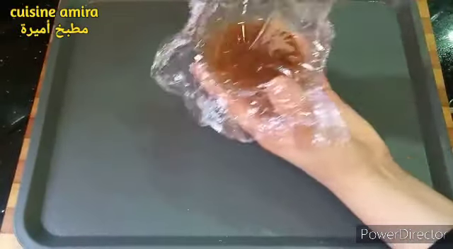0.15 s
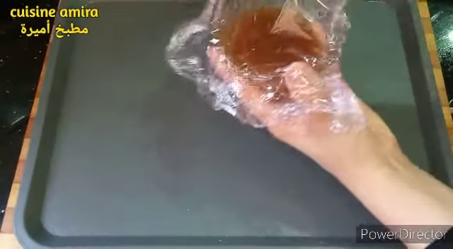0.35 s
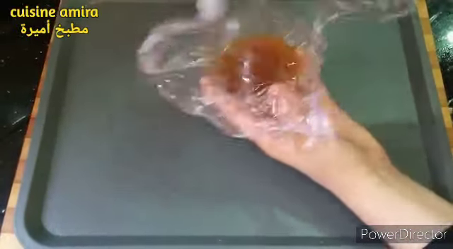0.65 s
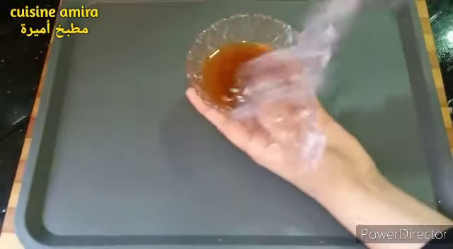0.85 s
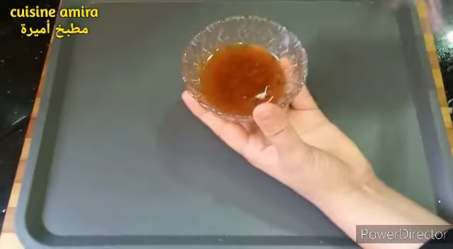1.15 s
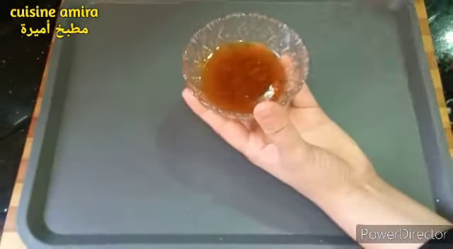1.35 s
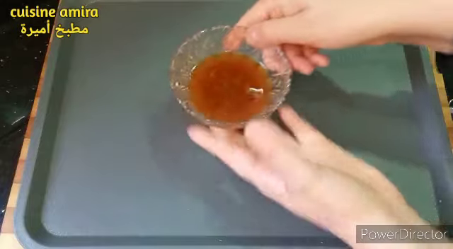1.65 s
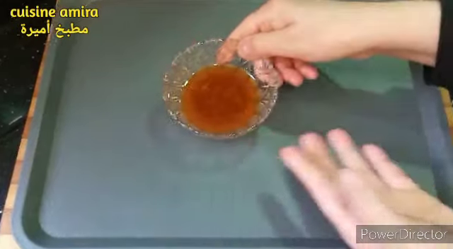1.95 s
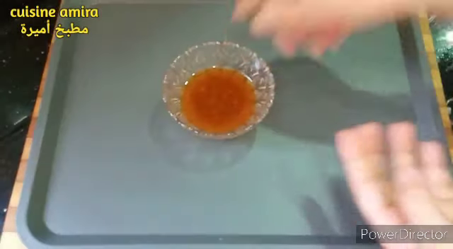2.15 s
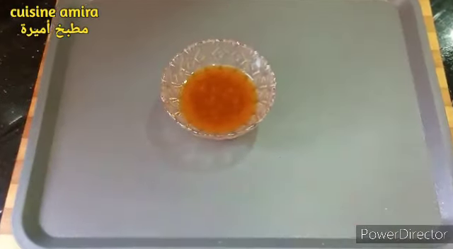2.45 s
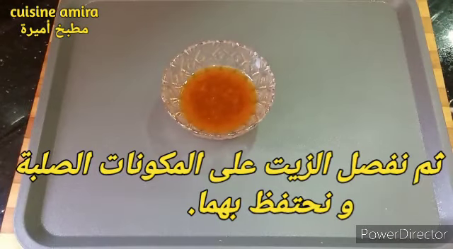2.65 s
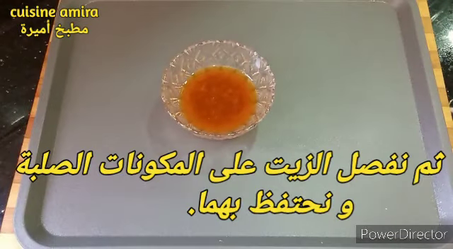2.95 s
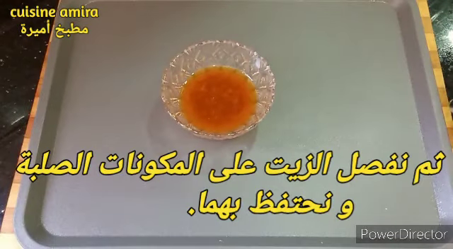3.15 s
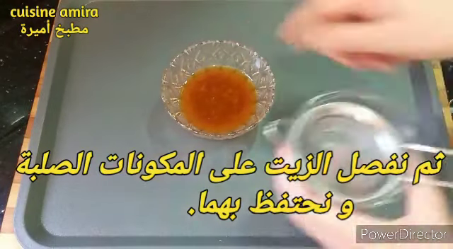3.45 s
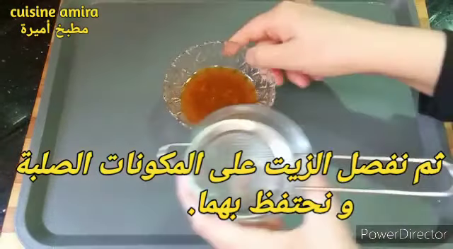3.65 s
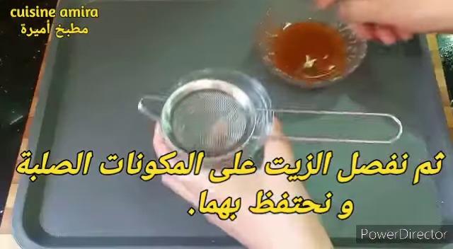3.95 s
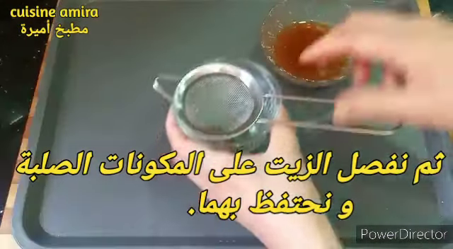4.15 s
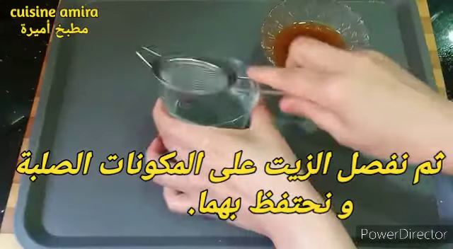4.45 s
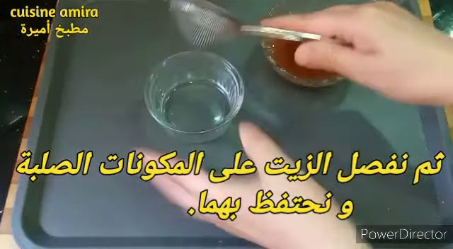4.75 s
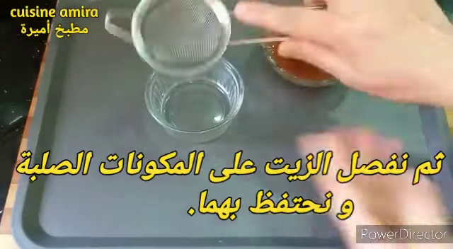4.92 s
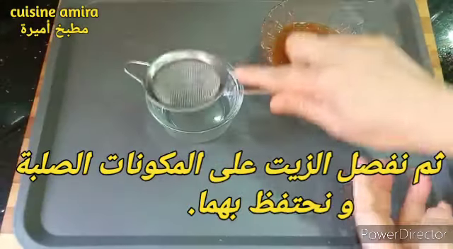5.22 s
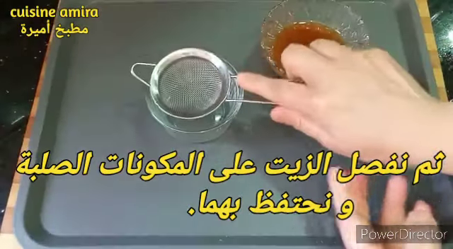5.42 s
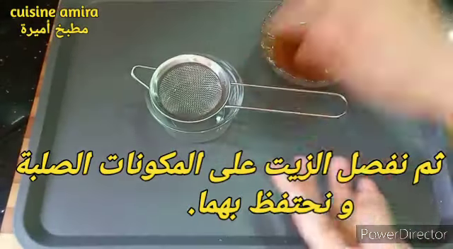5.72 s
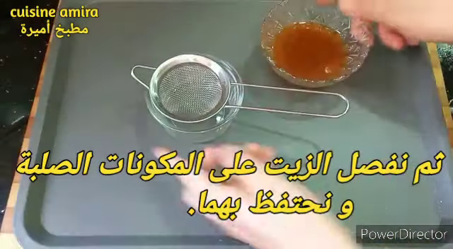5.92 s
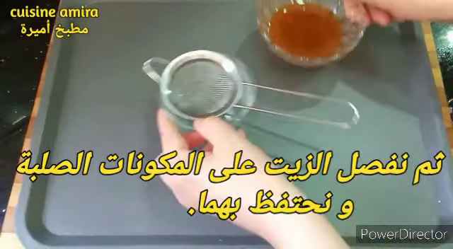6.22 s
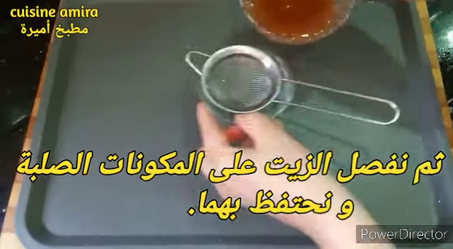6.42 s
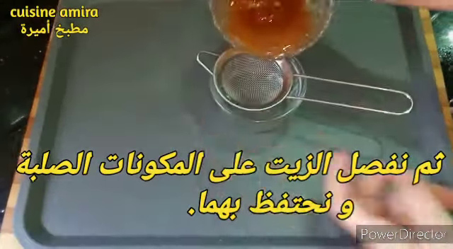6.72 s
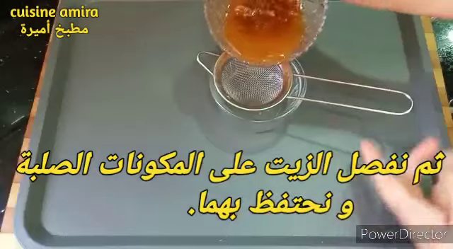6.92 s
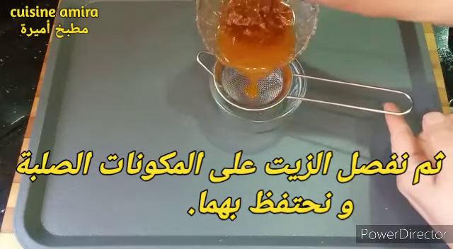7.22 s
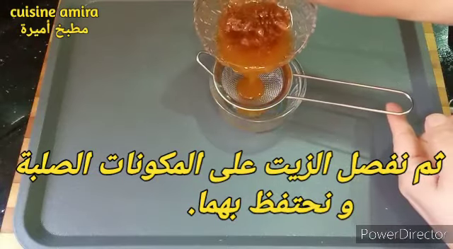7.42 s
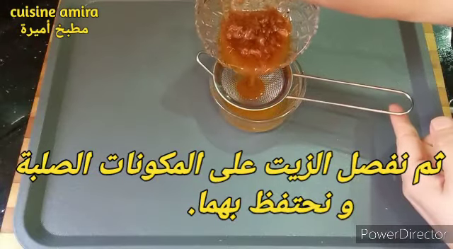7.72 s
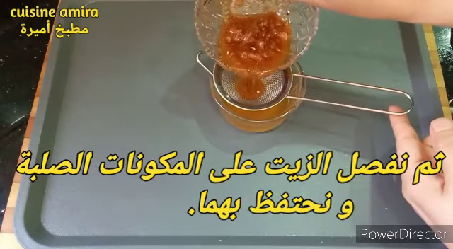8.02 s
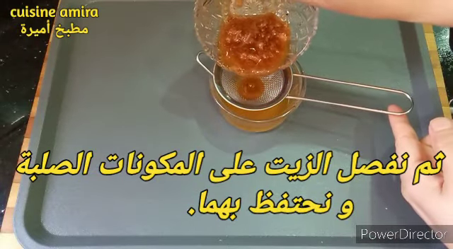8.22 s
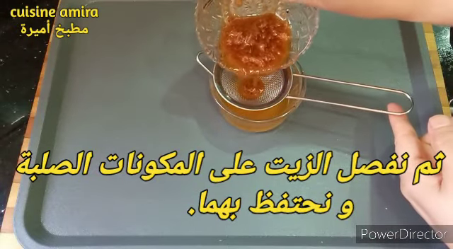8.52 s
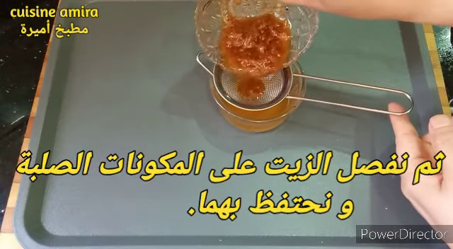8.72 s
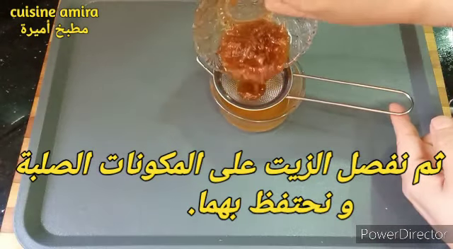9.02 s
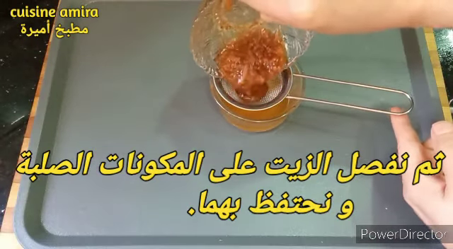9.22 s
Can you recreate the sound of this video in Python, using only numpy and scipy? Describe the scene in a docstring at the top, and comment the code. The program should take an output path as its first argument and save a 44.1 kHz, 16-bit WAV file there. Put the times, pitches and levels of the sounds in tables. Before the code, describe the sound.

A brief close kitchen moment opens: plastic wrap crinkling and snapping, soft clinks from a glass bowl, a fridge humming. It stops dead and woodland birdsong follows. One songbird near the microphone delivers a rapid trilled phrase with downward sweeps, pauses while distant birds chirp and give rising whistles, then sings again. The notes trail off among the trees above a soft, steady hush of air.

```python
"""Cling film crackles off a ringing glass bowl over a fridge hum; the kitchen stops dead at 1.5 s.
Then a wood: a near songbird sings two phrases (buzz, trill, falling sweeps, flourish) and farther
birds whistle around them over a soft hush. The film is dense clicks through resonances, the bowl
decaying sines, the hum narrow noise bands. Each bird note is a gliding, often warbling sine;
trunks and leaves scatter it into a long tail."""
import sys
import numpy as np
from scipy import signal
from scipy.fft import rfft, irfft
from scipy.io import wavfile
from scipy.ndimage import uniform_filter1d

SR = 44100
rng = np.random.default_rng(int(sys.argv[2]) if len(sys.argv) > 2 else 0)


def file_out(sig):
    """Save sig as 16-bit WAV at sys.argv[1]."""
    # one column per channel
    cols = np.atleast_2d(sig).T
    # limit, then scale
    lim = np.clip(cols, -1, 1)
    pcm = np.round(lim * 32767).astype(np.int16)
    wavfile.write(sys.argv[1], SR, pcm)


N = 413216

# hush of the wood: freq_hz, gain_db
HUSH_SPECTRUM = [(15, -48), (25, -17), (86, -8.5), (204, -7.5), (482, -8), (1110, -4), (1620, -7),
                 (3930, 2), (4380, -5), (5140, -6.5), (6050, -10.5), (14300, -14.5), (15500, -31)]
# distant rumble: time_s, level_db
RUMBLE_LEVELS = [(1.58, -73), (3.0, -74.5), (4.5, -77), (5.4, -75), (6.1, -78), (6.5, -72.5), (8.3, -78),
                 (9.37, -77.5)]

# fridge: centre_hz, width_hz, level_db
HUM_BANDS = [(45, 49, -69), (105, 18, -65), (140, 9.1, -56.5), (149.6, 36, -59.5), (225, 38, -68.5)]
# resonances of film, film treble, bowl and worktop: centre_hz, width_hz, gain_db
FILM_MODES = [(1382, 620, -4), (2350, 1750, -1), (3510, 1200, 0.8)]
SHEEN_MODES = [(6820, 1250, 0), (13400, 3900, -14.5)]
BOWL_MODES = [(252, 310, -1.5), (422, 105, -1.5), (589, 103, 3.5), (893, 215, -0.5), (1058, 320, 0)]
# hands on the bowl: time_s, level_db
HAND_LEVELS = [(0, -43), (.012, -44), (.032, -43), (.12, -50), (.236, -47.5), (.35, -54), (.44, -51),
               (.85, -60.5), (.95, -51.5), (1.004, -56), (1.19, -71), (1.264, -56), (1.4, -70), (1.49, -55)]
# bowl rings: start_s, pitch_hz, level_db, t60_s
BOWL_RINGS = [(.005, 574, -63, 0.49), (.182, 1590, -36, 0.071), (.235, 1586, -36, 0.11),
              (.18, 592, -48, 0.21), (.44, 1583, -42, 0.33), (.44, 593, -43, 0.22), (1.235, 656, -48, 0.54)]
# tugs on the film: peak_s, level_db, rise_s, fall_s
FILM_TUGS = [(.015, -39, 0.045, 0.065), (0.037, -42, 0.0046, 0.08), (0.453, -44.5, 0.044, 0.57),
             (.688, -47, 0.014, 0.018), (.95, -47, 0.013, 0.038), (1.152, -55.5, 0.026, 0.043),
             (1.264, -80.5, 0.037, 0.046), (1.49, -52.5, 0.057, 0.054)]
# snapping creases: start_s, peak_db, centre_hz, t60_s
CREASE_SNAPS = [(0.033, -20, 2100, .015), (.062, -32, 1400, .015), (.452, -36, 1580, .02),
                (.48, -33, 1100, .02), (.505, -35, 1500, .02), (0.721, -37, 1660, .02),
                (0.829, -37, 1600, .025), (0.866, -42, 1500, .025), (.908, -47, 7000, .015),
                (0.932, -31, 2000, .02), (0.951, -30, 1550, .03), (1.1, -47, 1770, .02),
                (1.137, -49, 2650, .02)]

# warbled syllables: offset_s, pitch_hz, gain_db, depth_hz
BUZZ_CONTOUR = [(0, 5190, -20.5, 203), (.014, 5390, -14, 800), (.035, 5160, -7, 834), (.075, 5274, -6, 916),
                (.094, 4900, -7, 1000), (.102, 4460, -8.5, 610)]
SWEEP_CONTOUR = [(-.018, 5697, -45.5, 150), (-.006, 6000, -37, 220), (-.001, 5796, -22, 250),
                 (.003, 5386, -12, 650), (.013, 4400, -5.5, 510), (.032, 4150, -4.5, 490),
                 (.045, 3573, -4.5, 290), (.056, 3100, -5, 68), (.069, 2592, -5.5, 0.45),
                 (.079, 2040, -28, 3.4)]
# trill note, closing arch: offset_s, pitch_hz, gain_db
CHIP_CONTOUR = [(.0085, 3950, -19), (.0115, 5210, -14.5), (.014, 5054, -16.5), (.017, 4280, -12.5),
                (.021, 3800, -10), (.027, 3700, -12), (.032, 3600, -26)]
ARCH_CONTOUR = [(0, 2580, -10), (.006, 4110, -0.5), (.012, 5035, -5), (.018, 5010, -5), (.025, 3800, -3),
                (.031, 2580, -6)]
# glided syllables: offset_s, length_s, start_hz, peak_hz, end_hz, gain_db, peak_share, start_gain_db
TICK_GLIDES = [(0, .0062, 6300, 4700, 3500, -18, .55, -13)]
HOOK_GLIDES = [(.009, .009, 4570, 4980, 3250, -13, 0.24, -4),
               (.018, 0.016, 3330, 3830, 3730, -10.5, 0.35, -14)]
DROP_GLIDES = [(-.008, .005, 5860, 3940, 3530, -4, 0.35, -36),
               (-.001, .035, 3965, 3457, 1850, -1.5, 0.146, -5),
               (.043, .013, 1950, 2786, 3690, -8.5, .55, -19),
               (.056, 0.011, 3680, 2490, 2240, -12.5, 0.82, 0.5)]
GRACE_GLIDES = [(.08, .022, 2990, 2630, 1890, -8, 0.3085, -18.5),
                (.105, .016, 2494, 2185, 1886, -13.5, 0.37, -25.5)]

# syllables as sung: start_s, level_db, pitch_ratio, length_ratio, pan_db (left minus right), reach_ratio
BUZZES = [(1.39, -57, 1.015, 1.02, -2, 0.76), (1.627, -33, 0.97, 0.94, 3.5, 0.82),
          (6.577, -45.5, 1.06, 1.03, -6, 0.68)]
DROPS = [(2.184, -31, 1.017, .99, 1.6, 0.92), (7.222, -27.5, 1.03, 1.14, 3.9, 0.86)]
SWEEPS = [(2.3524, -29.5, 0.97, 1, 1.7, 0.97), (2.564, -28.5, 1.023, 0.96, 2.6, 1.013),
          (7.3916, -27, 1.037, 0.99, 1.2, 0.95), (7.608, -26.5, 1.072, 0.89, 1.6, 1.08)]
ARCHES = [(2.983, -39.5, 1.08, 1, 4.3, 0.91), (8.08, -42.5, 1, 1.01, 4.2, 0.95)]
FAR_BUZZES = [(3.67, -58, .74, 2.5, 3.1, 0.303), (5.847, -59.5, 0.896, 0.94, 5.6, .6)]
# trill notes as sung: start_s, level_db, pitch_ratio, reach_ratio
TRILL_CHIPS = [(1.775, -22, 1.04, 1), (1.8477, -26.5, 1.03, 1.07), (1.9792, -17.5, 0.98, 0.96),
               (2.0455, -19.5, 0.95, 0.64), (2.1074, -17.5, 0.95, 0.56), (6.782, -27.5, 0.98, 1.16),
               (6.846, -27.5, 1.066, 0.82), (6.9088, -21.5, 1.0, 1.1), (6.9727, -21, 0.98, 1.12),
               (7.0357, -21.5, 0.97, 1.005), (7.0934, -20, 0.97, 0.81)]
TRILL_HOOKS = [(1.9134, -19, 1.013, 0.75), (6.7172, -29.5, 0.97, 0.97), (7.1545, -17.5, .96, 0.97)]
# flourish lead-in: start_s, length_s, start_hz, peak_hz, end_hz, level_db, peak_share, start_gain_db
FLOURISH_LEADS = [(2.738, 0.0052, 6160, 4410, 3260, -38, 0.61, -14),
                  (2.751, 0.023, 2950, 2890, 2770, -38, 0.47, -15),
                  (2.767, 0.038, 2665, 3910, 3330, -29, 0.82, -28),
                  (7.809, 0.011, 2570, 3300, 2100, -42.5, 0.22, -8),
                  (7.818, 0.034, 2090, 3387, 3420, -33.5, 0.61, -26),
                  (7.845, 0.012, 3462, 4698, 2440, -34.5, 0.4, 3)]
# flourish warbles: the lead-in columns, then end_gain_db, depth_hz, rate_hz, crest_s, pan_db
FLOURISH_WARBLES = [(2.803, 0.047, 3150, 3050, 3000, -35.5, .55, -5, -2, 450, 62.1, 2.813, 1.5),
                    (2.848, .06, 2900, 2700, 1950, -42, .15, -3, -6, 330, 111, 2.853, 1.5),
                    (7.855, 0.056, 2850, 2900, 2650, -36, 0.5, -2, -2, 480, 51.9, 7.864, .6),
                    (7.91, .022, 2500, 2400, 2200, -40, .3, -3, -8, 350, 100, 7.916, .6),
                    (7.932, .078, 2150, 2120, 2050, -49, .5, -3, -3, 230, 102, 7.949, .6)]
# swell of each flourish warble: length_share, depth_share
WARBLE_SWELL = [(0, 0.34), (.3, 0.85), (.65, 1), (1, 0.33)]
# bill snapping shut: time_s, peak_db
BILL_SNAPS = [(1.778, -36), (1.794, -56), (7.282, -42)]

# far whistles: start_s, length_s, start_hz, peak_hz, end_hz, level_db, pan_db
FAR_WHISTLES = [(1.565, 0.039, 6440, 6100, 7450, -63.5, -3), (3.462, 0.051, 1880, 2180, 1850, -60.5, 12.5),
                (3.561, 0.1, 2045, 1990, 2320, -65, 16.5), (3.545, 0.14, 3760, 4084, 4085, -54, 0),
                (3.679, 0.15, 3730, 3796, 4060, -58.5, 4.5), (3.773, 0.13, 3620, 3720, 3840, -60, -2),
                (3.904, 0.054, 3600, 3710, 3580, -66, -6), (1.698, 0.26, 3220, 3100, 2764, -64, 1.5),
                (1.974, 0.073, 2266, 2236, 2110, -70, -7.5), (2.54, 0.11, 8200, 7880, 7780, -66.5, -1),
                (2.852, 0.099, 5100, 4880, 4880, -62, 3), (2.943, 0.065, 5420, 5350, 5270, -59.5, 3),
                (3.013, .07, 5400, 5320, 5250, -60.5, 3), (3.042, 0.09, 3304, 3354, 3490, -60, 14.5),
                (3.61, 0.061, 3570, 3190, 3970, -59.5, 1), (4.15, 0.049, 3680, 3550, 3400, -73, 13),
                (4.348, 0.064, 3450, 3390, 3350, -68, 8), (4.608, 0.12, 4230, 4130, 4360, -73, 1),
                (4.611, 0.34, 3410, 3350, 3430, -72.5, 5), (4.888, 0.18, 4270, 4210, 4210, -73.5, 6),
                (4.61, 0.19, 2060, 2197, 2404, -63.5, 8), (4.011, 0.025, 2190, 2100, 1860, -64, 13),
                (4.745, .025, 2620, 2255, 1960, -54, 8), (5.269, 0.074, 4040, 3965, 4020, -59.5, 6.5),
                (5.423, 0.031, 2030, 2625, 4080, -58, 12), (5.424, 0.049, 4290, 5460, 7800, -66.5, 16),
                (5.45, 0.053, 3650, 4394, 3920, -47.5, 1), (5.654, 0.084, 4000, 4034, 3905, -57, 3),
                (5.713, 0.23, 4006, 3916, 3814, -59, 5), (6.324, 0.017, 1870, 2000, 2320, -71.5, 16),
                (6.454, 0.41, 3200, 3090, 2815, -64, 2.5), (6.521, 0.039, 6250, 6220, 6400, -68, -6),
                (8.097, 0.014, 10300, 8100, 7540, -54.5, 13.5), (6.72, 0.17, 8150, 8070, 8300, -72, -3),
                (7.078, 0.021, 5680, 6070, 5930, -58, -14.5), (7.565, 0.039, 3770, 3320, 2880, -49, 8),
                (8.434, 0.15, 2990, 2977, 2992, -65.5, -1), (9.016, 0.071, 2870, 2970, 2860, -70.5, -6),
                (8.154, 0.094, 3900, 4220, 3955, -56, -4.5), (8.241, 0.034, 3640, 3200, 2970, -56, 12.5),
                (8.275, 0.033, 2910, 3290, 3420, -55.5, 7), (8.177, 0.0203, 4630, 4240, 3920, -59, 2),
                (8.336, 0.047, 3760, 3460, 2750, -55.5, -4), (8.577, .012, 4970, 4330, 3900, -63, 0),
                (8.595, 0.061, 3180, 3546, 3680, -53.5, 0), (8.638, 0.11, 4280, 4230, 4110, -63.5, -7),
                (8.701, 0.057, 7960, 7580, 7070, -66, 8), (8.816, 0.0474, 5820, 5650, 5330, -55.5, 4.5),
                (8.91, 0.061, 7870, 7770, 7640, -65, 10), (8.908, 0.022, 4780, 4300, 4130, -54, -1),
                (8.927, 0.011, 3430, 3230, 3100, -59, 9.5), (8.699, 0.035, 2280, 2370, 2210, -75, 19),
                (8.994, 0.024, 2280, 2320, 2270, -76, 16), (6.558, 0.025, 1930, 2020, 2340, -71.5, 10),
                (9.006, 0.063, 5720, 5610, 5485, -51.5, 6), (9.079, 0.11, 4180, 4730, 4950, -60, -2),
                (9.1, 0.08, 6170, 6350, 6040, -64, 0), (9.214, 0.043, 5430, 5450, 5230, -55.5, 2.5),
                (9.306, 0.032, 3700, 4010, 3860, -60, -4), (9.315, 0.038, 3480, 3040, 2480, -57, 14),
                (9.322, 0.042, 7060, 7150, 6900, -67.5, 10)]
# rising calls, one contour each: time_s, pitch_hz, level_db
RISING_CALLS = [
    [(4.04, 1807, -59.5), (4.06, 2240, -46.5), (4.075, 2472, -47), (4.092, 2470, -43), (4.105, 2745, -45.5),
     (4.113, 2710, -45), (4.12, 2330, -56), (4.126, 1950, -60)],
    [(4.23, 1914, -63), (4.245, 2278, -54), (4.258, 2496, -42), (4.285, 2638, -45.5), (4.305, 2694, -41.5),
     (4.322, 2622, -44), (4.331, 2230, -58), (4.338, 1900, -63)],
    [(4.76, 2014, -58), (4.78, 2166, -54), (4.8, 2470, -46), (4.83, 2610, -40.5), (4.85, 2652, -52),
     (4.862, 2920, -49), (4.87, 2480, -51), (4.877, 2200, -61)],
    [(5.02, 2040, -60), (5.04, 2304, -45), (5.06, 2556, -44), (5.08, 2560, -46), (5.095, 2670, -49),
     (5.112, 2682, -44), (5.12, 2360, -52), (5.128, 1970, -61)],
]
# wing flutter: start_s, length_s, centre_hz, width_hz, level_db
WING_FLUTTERS = [(5.408, 0.098, 5760, 3500, -59)]

KITCHEN_END_S, BUZZ_RATE_HZ, SWEEP_RATE_HZ = 1.492, 85.2, 164.7
NEAR_LAG_SAMPLES, FAR_LAG_SAMPLES = 1, 8  # right ear late


def undb(db):
    """Decibels to gain."""
    return 10 ** (np.asarray(db) / 20)


def unit_rms(x):
    """Scale to rms 1."""
    return x / np.sqrt(np.mean(x ** 2))


def band(x, hz, width_hz):
    """Resonance, gain 1 at the centre."""
    return signal.lfilter(*signal.iirpeak(hz, hz / width_hz, SR), x)


def steep_band(x, hz, width_hz):
    """Two resonances in series, the second twice as wide."""
    return band(band(x, hz, width_hz), hz, 2 * width_hz)


def resonate(x, modes):
    """Parallel resonances of alternating sign, rms 1."""
    return unit_rms(sum((-1) ** k * undb(db) * unit_rms(steep_band(x, hz, width_hz))
                        for k, (hz, width_hz, db) in enumerate(modes)))


def wander(count, rate_hz):
    """Smooth random curve, spread near 1."""
    step = int(SR / rate_hz)
    stairs = np.repeat(rng.standard_normal(count // step + 1), step)
    return 1.2 * uniform_filter1d(uniform_filter1d(stairs, step), step)[:count]


def hush(t, upper_db=-67, crossover_hz=330):
    """Air of the wood: noise, wider in the treble, over a slowly swelling rumble."""
    hz = np.maximum(np.arange(N // 2 + 1) * SR / N, 1)
    knot_hz, knot_db = np.transpose(HUSH_SPECTRUM)
    shape = undb(np.interp(np.log(hz), np.log(knot_hz), knot_db))
    mid, side = rfft(rng.standard_normal((2, N))) * shape
    side *= np.clip(hz / 1800, .45, .98)
    ears = np.array([mid + side, mid - side])
    bass_share = 1 / (1 + (hz / crossover_hz) ** 2)
    rumble = undb(np.interp(t, *np.transpose(RUMBLE_LEVELS))) * unit_rms(irfft(ears * bass_share, N))
    return rumble + undb(upper_db) * unit_rms(irfft(ears * (1 - bass_share), N))


def fridge():
    """Hum: low, narrow noise bands."""
    return sum(undb(db) * unit_rms(steep_band(rng.standard_normal(N), hz, width_hz))
               for hz, width_hz, db in HUM_BANDS)


def bowl(t, clicks, attack_s=.0063):
    """Hands rustle on the glass; it rings as fingers shift."""
    out = undb(np.interp(t, *np.transpose(HAND_LEVELS))) * resonate(clicks, BOWL_MODES)
    for start_s, hz, db, t60_s in BOWL_RINGS:
        age_s = np.maximum(t - start_s, 0)
        envelope = undb(db - 60 * age_s / t60_s) * (1 - np.exp(-age_s / attack_s))
        out += envelope * np.sin(2 * np.pi * hz * age_s)
    return out


def film_crackle(t, clicks, fall_db_per_decade=36, sheen_db=-17.5):
    """Each tug swells the crackle, which dies fast, then ever more slowly."""
    power = 0
    for peak_s, db, rise_s, fall_s in FILM_TUGS:
        rise = np.exp(np.minimum(t - peak_s, 0) / rise_s)
        fall = undb(db - fall_db_per_decade * np.log10(1 + np.maximum(t - peak_s, 0) / fall_s))
        power += (rise * fall) ** 2
    crackle = resonate(clicks, FILM_MODES) + undb(sheen_db) * resonate(clicks, SHEEN_MODES)
    return np.sqrt(power) * crackle


def film_creases(t, width_ratio=.85):
    """Creases snap: short, band-limited noise bursts."""
    out = np.zeros(N)
    count = SR // 10
    for start_s, db, hz, t60_s in CREASE_SNAPS:
        burst = rng.standard_normal(count) * undb(-60 * t[:count] / t60_s)
        snap = steep_band(burst, hz, width_ratio * hz)
        first = int(start_s * SR)
        out[first:first + count] += undb(db) * snap / np.max(np.abs(snap))
    return out


def kitchen(t, click_chance=.12, cut_s=.0012):
    """Film, bowl and fridge, centred, cut off together; one click train drives crackle and rustle."""
    occurs, polarity, size = rng.random((3, N))
    click_db = -2.5 * np.log(1 - size) + .46 * wander(N, 60)
    clicks = (occurs < click_chance) * np.sign(polarity - .5) * undb(click_db)
    out = film_crackle(t, clicks) + film_creases(t) + bowl(t, clicks) + fridge()
    return out * np.clip((KITCHEN_END_S - t) / cut_s, 0, 1)


def wood_echoes(dry, t60_s, tail_db, build_s, twig_t60_s, twig_db, treble_hz=7200):
    """Direct sound, close twig echoes and a clumpy tail off trunks; leaves damp its treble sooner."""
    t = np.arange(int(1.5 * SR)) / SR
    clumps = undb(2 * wander(len(t), 60))
    noise = rng.standard_normal((2, len(t))) * clumps * (1 - np.exp(-t / build_s))
    low = signal.sosfiltfilt(signal.butter(2, treble_hz, fs=SR, output="sos"), noise)
    tail = low * undb(-60 * t / t60_s) + (noise - low) * undb(-60 * t / (.35 * t60_s))
    tail = signal.lfilter([1], [1, -.15], tail)  # mild low-pass
    twigs = rng.standard_normal((2, len(t))) * undb(-60 * t / twig_t60_s)
    response = sum(undb(db) * part / np.linalg.norm(part, axis=1, keepdims=True)
                   for part, db in ((tail, tail_db), (twigs, twig_db)))
    return dry + signal.fftconvolve(dry, response, axes=1)[:, :N]


def glide(start_s, length_s, start_hz, peak_hz, end_hz, level_db, peak_share, start_gain_db,
          end_gain_db=-17, fall_power=1.57, bend_power=1.212):
    """Contour (time_s, pitch_hz, level_db) bending through peak_hz, where it is loudest."""
    share = np.linspace(0, 1, 25)
    before = np.clip(1 - share / peak_share, 0, 1)
    after = np.clip((share - peak_share) / (1 - peak_share), 0, 1)
    hz = peak_hz + (start_hz - peak_hz) * before ** bend_power + (end_hz - peak_hz) * after ** bend_power
    db = level_db + start_gain_db * before ** 4.7 + end_gain_db * after ** fall_power
    return np.transpose([start_s + length_s * share, hz, db])


def glides(table, **shape):
    """One contour per row."""
    return [glide(*row, **shape) for row in table]


def add_note(out, contour, pan_db, lag_samples, warble_hz=0, crest_s=0,
             jitter=.00677, flutter_db=.5, lift_db_per_hz=.0029, pulse_db=0):
    """Unsteady sine on a contour. Lift favours the warble's crests (troughs if < 0), pulse mid-swing."""
    time_s, hz, db, *depth = np.transpose(contour)
    first = int(time_s[0] * SR)
    t = np.arange(first, min(int(time_s[-1] * SR), N - lag_samples)) / SR
    count = len(t)
    swing = np.cos(2 * np.pi * warble_hz * (t - crest_s))
    swing_hz = swing * np.interp(t, time_s, depth[0]) if depth else 0
    line_hz = uniform_filter1d(np.interp(t, time_s, hz), size=40)
    pitch_hz = line_hz * (1 + jitter * wander(count, 149.8)) + swing_hz
    warble_db = lift_db_per_hz * swing_hz - pulse_db * (2 * swing ** 2 - 1)
    level_db = np.interp(t, time_s, db) + warble_db + flutter_db * wander(count, 163.8)
    note = undb(level_db) * np.sqrt(2) * np.sin(2 * np.pi * np.cumsum(pitch_hz) / SR)
    note *= 1 + .07 * wander(count, 1500)  # rasp
    note *= signal.windows.tukey(count, min(220 / count, 1))
    left_db = pan_db + .3 * (pitch_hz / 1000 - 3.5)  # high notes lean left
    out[0, first:first + count] += undb(left_db / 2) * note
    out[1, first + lag_samples:first + lag_samples + count] += undb(-left_db / 2) * note


def sing(contours, events, lag_samples=NEAR_LAG_SAMPLES, warble_hz=0, crest_s=0, **voice):
    """One syllable per event; reach scales its pitch moves about the loudest point."""
    out = np.zeros((2, N))
    points = np.vstack([np.array(contour)[:, :3] for contour in contours])
    home_hz = points[np.argmax(points[:, 2]), 1]
    for start_s, level_db, pitch_ratio, stretch, pan_db, reach in events:
        for contour in contours:
            offset_s, hz, gain_db, *depth = np.transpose(contour)
            pitch_hz = pitch_ratio * (home_hz + reach * (hz - home_hz))
            sung = [start_s + stretch * offset_s, pitch_hz, level_db + gain_db]
            sung += [reach * depth_hz for depth_hz in depth]
            add_note(out, np.transpose(sung), pan_db, lag_samples,
                     warble_hz / stretch, start_s + crest_s * stretch, **voice)
    return out


def wings(t):
    """A short flutter of air: one swell of band noise."""
    out = np.zeros((2, N))
    for start_s, length_s, hz, width_hz, db in WING_FLUTTERS:
        swell = np.sin(np.pi * np.clip((t - start_s) / length_s, 0, 1))
        out += undb(db) * swell * unit_rms(steep_band(rng.standard_normal((2, N)), hz, width_hz))
    return out


def far_birds(trill_start_s=5.9958, trill_step_s=.0687, trill_db=-49, step_db=.94):
    """A swelling nine-note trill, two buzzes, and whistles that shimmer on the long way."""
    trill = [(trill_start_s + k * trill_step_s, trill_db + k * step_db, .99, .9, 9.3, .52)
             for k in range(9)]  # columns as FAR_BUZZES
    out = sing(glides(TICK_GLIDES) + [CHIP_CONTOUR], trill, FAR_LAG_SAMPLES)
    out += sing([BUZZ_CONTOUR], FAR_BUZZES, FAR_LAG_SAMPLES, warble_hz=BUZZ_RATE_HZ)
    for *row, pan_db in FAR_WHISTLES:
        contour = glide(*row, peak_share=.37, start_gain_db=-17, end_gain_db=-13, fall_power=3.5)
        add_note(out, contour, pan_db, FAR_LAG_SAMPLES, jitter=.008, flutter_db=4)
    return wood_echoes(out, t60_s=.7, tail_db=-4.5, build_s=.015, twig_t60_s=.08, twig_db=-8)


def rising_caller():
    """Four rising whistles, each arching into a downward flick."""
    out = np.zeros((2, N))
    for contour in RISING_CALLS:
        add_note(out, contour, pan_db=9.5, lag_samples=FAR_LAG_SAMPLES, jitter=.004, flutter_db=2.5)
    return wood_echoes(out, t60_s=.68, tail_db=-7, build_s=.02, twig_t60_s=.04, twig_db=-15)


def bill():
    """The bill snaps shut: bright single clicks."""
    clicks = np.zeros(N)
    for time_s, db in BILL_SNAPS:
        clicks[int(time_s * SR)] = undb(db)
    return band(clicks, hz=8000, width_hz=9000)


def near_trill(stretch=.93, pan_db=5):
    """Quick chips and hooks, each opened by a falling tick."""
    chips, hooks = ([(start_s, db, pitch, stretch, pan_db, reach) for start_s, db, pitch, reach in table]
                    for table in (TRILL_CHIPS, TRILL_HOOKS))
    ticks = [(start_s, db, 1, stretch, pan_db, 1) for start_s, db, *_ in chips + hooks]
    out = sing([CHIP_CONTOUR], chips, jitter=.012, flutter_db=2)
    return out + sing(glides(TICK_GLIDES), ticks) + sing(glides(HOOK_GLIDES), hooks)


def near_flourish():
    """Phrase ending: lead-in glides, swelling warbles, a last arch."""
    out = sing([ARCH_CONTOUR], ARCHES, jitter=.0086, flutter_db=3.5)
    for contour in glides(FLOURISH_LEADS, end_gain_db=-4, bend_power=1.11):
        add_note(out, contour, pan_db=2, lag_samples=NEAR_LAG_SAMPLES, jitter=.014, flutter_db=3)
    for start_s, length_s, *shape, depth_hz, rate_hz, crest_s, pan_db in FLOURISH_WARBLES:
        contour = glide(start_s, length_s, *shape)
        swell = np.interp((contour[:, 0] - start_s) / length_s, *np.transpose(WARBLE_SWELL))
        add_note(out, np.column_stack([contour, depth_hz * swell]), pan_db, NEAR_LAG_SAMPLES,
                 rate_hz, crest_s, jitter=.012, flutter_db=2, lift_db_per_hz=.018)
    return out


def near_bird():
    """Two phrases: buzz, trill, drop, falling sweeps with grace notes, flourish."""
    song = sing([BUZZ_CONTOUR], BUZZES, warble_hz=BUZZ_RATE_HZ, crest_s=.014,
                jitter=.025, flutter_db=2.5, pulse_db=4.5)
    song += sing([SWEEP_CONTOUR] + glides(GRACE_GLIDES), SWEEPS, warble_hz=SWEEP_RATE_HZ, crest_s=.0035,
                 jitter=.01, flutter_db=2.2, lift_db_per_hz=-.0024, pulse_db=.6)
    song += near_trill() + sing(glides(DROP_GLIDES), DROPS) + near_flourish()
    return wood_echoes(song, t60_s=.76, tail_db=-8.5, build_s=.012, twig_t60_s=.06, twig_db=-14) + bill()


def scene():
    """The wood throughout, the kitchen over its opening."""
    t = np.arange(N) / SR
    return near_bird() + far_birds() + rising_caller() + wings(t) + hush(t) + kitchen(t)


def record(dry):
    """Steep low-pass at 15.45 kHz."""
    return signal.sosfilt(signal.ellip(10, .2, 60, 15450, fs=SR, output="sos"), dry)


dry = scene()
out = record(dry)
file_out(out)
```